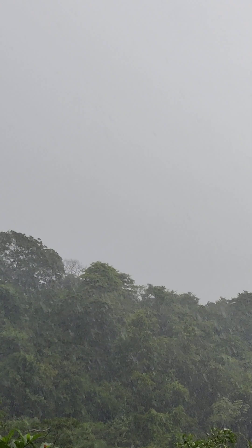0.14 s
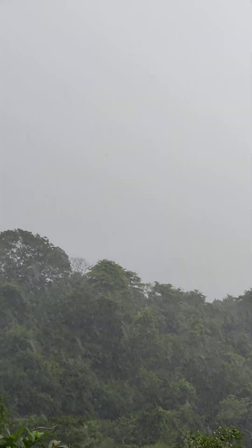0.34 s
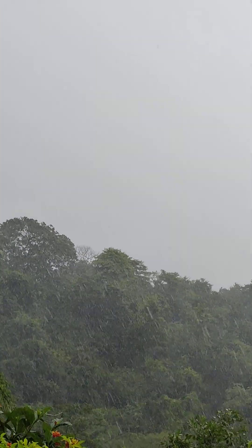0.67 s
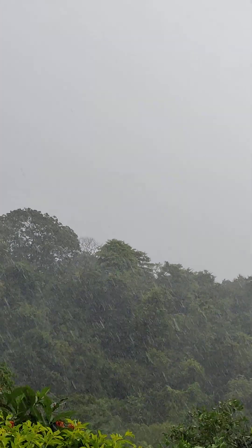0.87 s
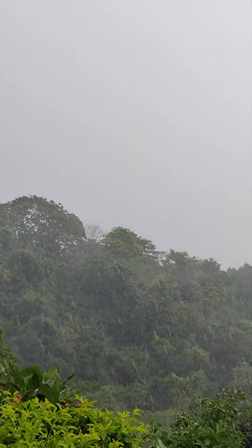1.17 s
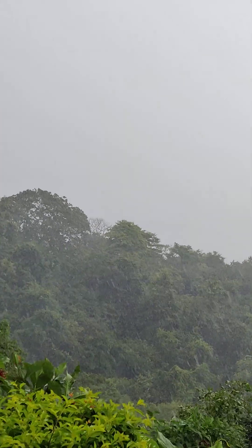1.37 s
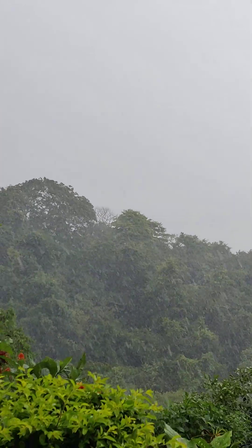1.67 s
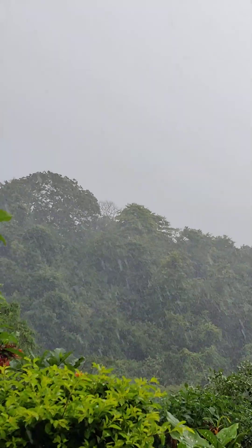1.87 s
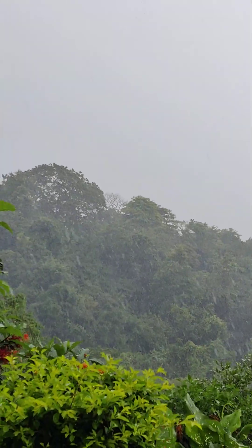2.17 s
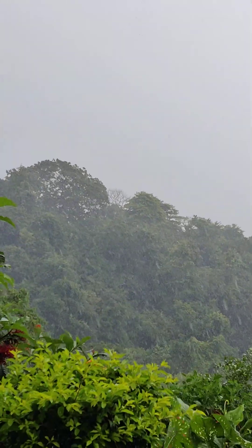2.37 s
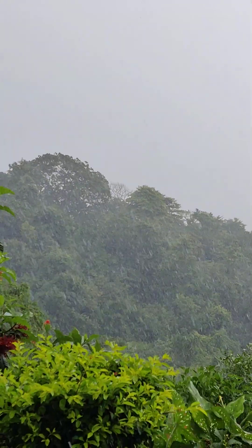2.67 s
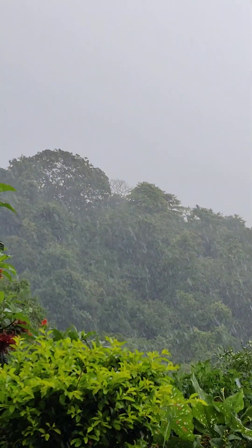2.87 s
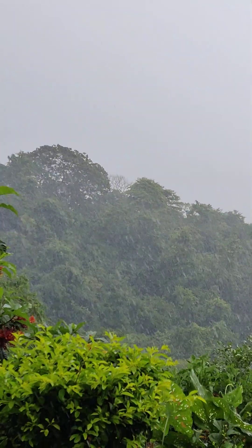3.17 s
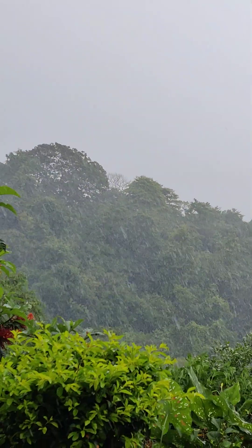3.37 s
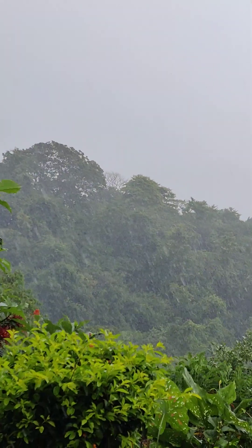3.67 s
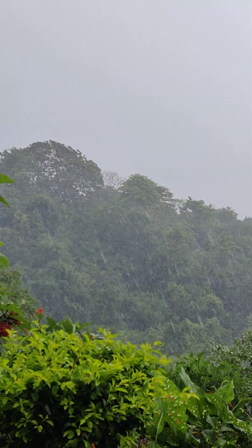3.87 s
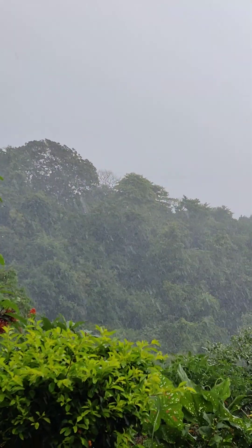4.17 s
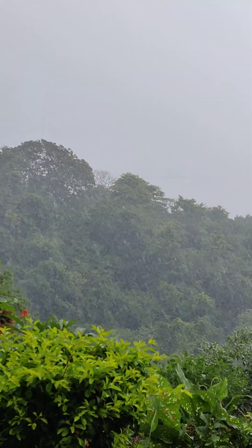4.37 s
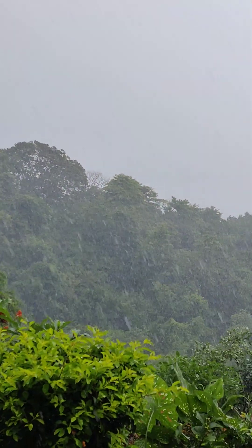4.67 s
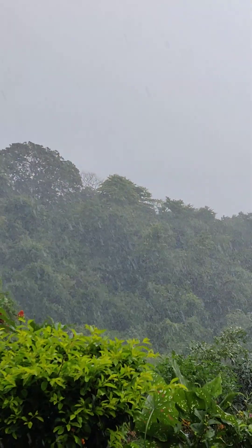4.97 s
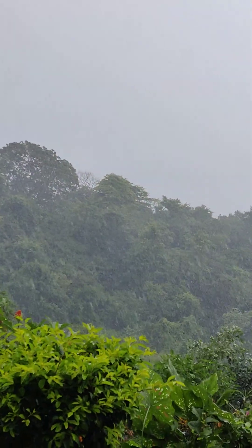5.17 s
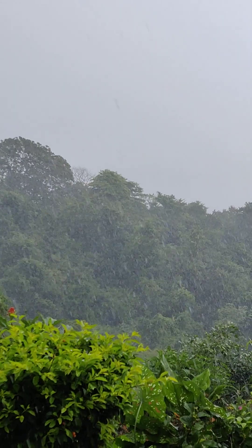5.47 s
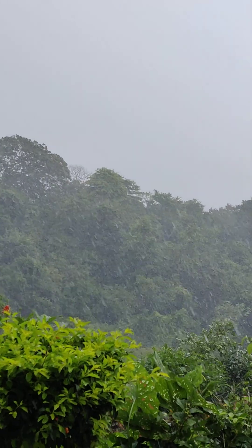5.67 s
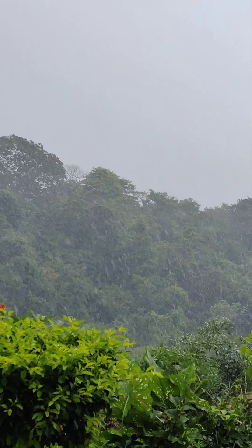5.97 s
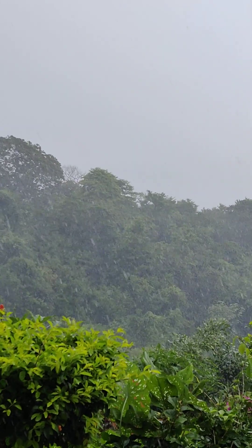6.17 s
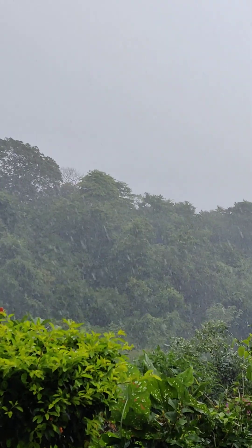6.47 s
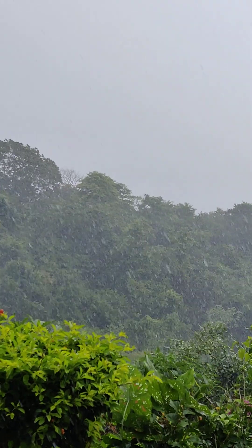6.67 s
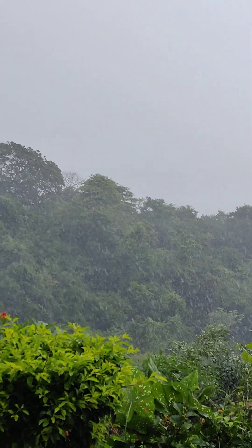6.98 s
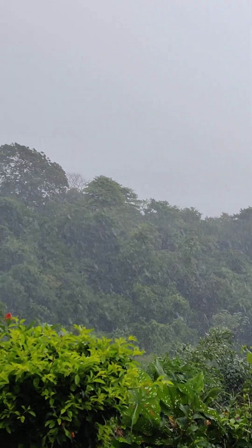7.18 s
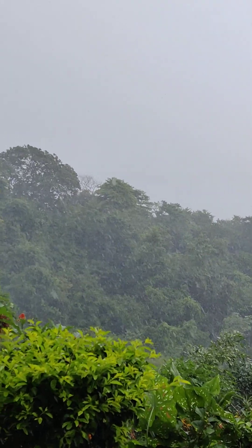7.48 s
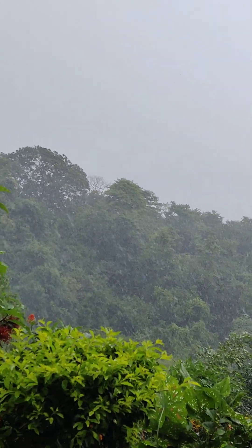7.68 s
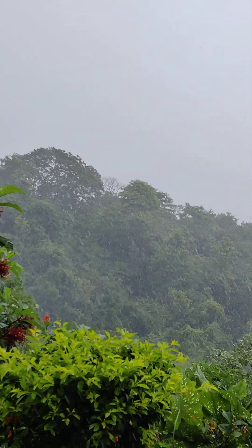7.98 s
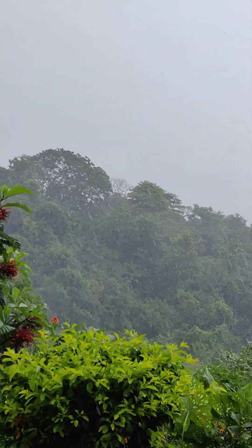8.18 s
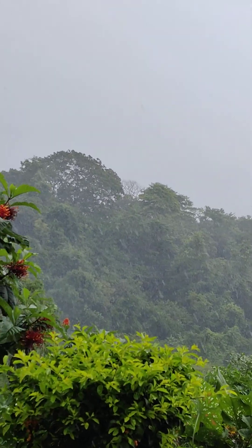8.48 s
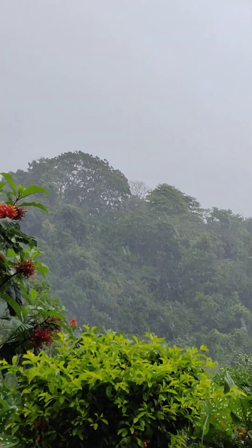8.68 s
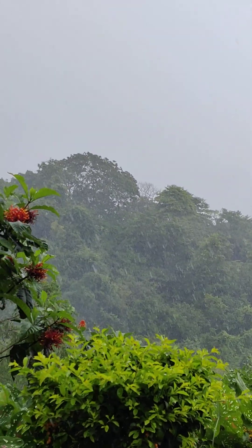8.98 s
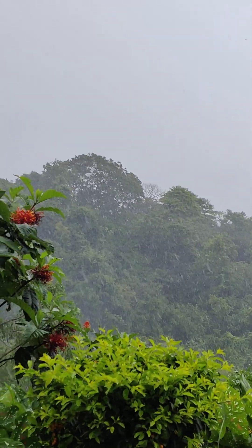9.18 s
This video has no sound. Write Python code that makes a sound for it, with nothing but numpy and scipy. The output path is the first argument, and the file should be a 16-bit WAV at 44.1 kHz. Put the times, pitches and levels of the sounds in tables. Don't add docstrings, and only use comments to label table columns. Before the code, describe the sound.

Heavy, steady rain fills the whole stretch from the first moment, falling on a wooded hillside and nearby garden plants. Far drops merge into a broad midrange roar; closer ones drum on broad leaves, with fine hiss and faint spray above. Far below, a distant motor drones faintly around 86 Hz, wavering in level and dropping very slightly in pitch near 5 s. Faint tiny ticks of close drops come at about 0.4, 0.6 and 1.3 s, then sparsely from 4 to 7.6 s. Wind rumbles on the microphone: low thumps mainly on the left at 1.7-2.5 s, a stronger cluster mainly on the right at 5.05-5.45 s, and single right puffs near 7.25 and 8.7 s. The patter is fullest around 2 and 5 s, then eases from about 5.7 s, lightest after 8.7 s, while the roar continues to the end at 9.3 s. Wide stereo, slightly rough phone treble.

```python
import sys
import numpy as np
from scipy import signal
from scipy.fft import rfft, irfft, next_fast_len
from scipy.io import wavfile
from scipy.ndimage import uniform_filter1d, map_coordinates

SR = 44100
rng = np.random.default_rng(int(sys.argv[2]) if len(sys.argv) > 2 else 0)


def unload_audio(sound):
    columns = np.transpose(np.atleast_2d(sound))
    steps = np.round(np.clip(columns, -1, 1) * 32767)
    wavfile.write(sys.argv[1], SR, steps.astype(np.int16))


def field_ratio(decibels):
    return 10 ** (np.asarray(decibels, dtype=float) / 20)


N = 411894


def unit(x):
    return x / np.sqrt(np.mean(x ** 2) + 1e-20)


def along(points, hz):
    point_hz, value = np.transpose(points)
    return np.interp(np.log(hz + 1), np.log(point_hz + 1), value)


def clock():
    return np.arange(N) / SR


def curves(rows):
    time_s, *columns = np.transpose(rows)
    return [np.interp(clock(), time_s, column) for column in columns]


def ramp(middle_s, span_s):
    return (1 + np.tanh((clock() - middle_s) / span_s)) / 2


def bump(middle_s, span_s):
    return np.exp(-((clock() - middle_s) / span_s) ** 2)


def wobble(rate_hz):
    knots = rng.standard_normal(N // 100)
    return map_coordinates(knots, [np.arange(N) * min(rate_hz, 400) / SR])


def filtered(x, response):
    size = next_fast_len(N + 8192)
    gain = response(np.fft.rfftfreq(size, 1 / SR))
    return irfft(rfft(x, size) * gain, size)[..., :N]


def smoothed_noise(shape, bins, frames):
    field = uniform_filter1d(rng.standard_normal(shape), bins, axis=1)
    return unit(uniform_filter1d(field, frames, axis=2))


def patchy(x, depth_db, bins, frames):
    z = signal.stft(x, nperseg=512)[2]
    gain = field_ratio(depth_db * smoothed_noise(z.shape, bins, frames))
    return signal.istft(z * gain, nperseg=512)[1][:, :N]


def drops(spectrum, near_db, spread_db, depth_db):
    # hz, port_correlation
    alike = [(60, 0.99), (140, 0.99), (330, 0.85), (600, 0.57), (950, 0.094), (1400, -0.33), (2200, 0.13),
             (3200, -0.056), (5000, 0.0022)]
    strike = rng.random((2, N)) < 600 / SR
    size = field_ratio(spread_db * rng.exponential(size=(2, N)))
    near = strike * rng.standard_normal((2, N)) * size
    blur = rng.standard_normal((2, N))
    pair = patchy(blur + field_ratio(near_db) * unit(near), depth_db, bins=6, frames=12)

    def mid_side_gain(hz):
        angle = np.arccos(np.clip(along(alike, hz), -1, 1)) / 2
        return field_ratio(along(spectrum, hz)) * [np.cos(angle), np.sin(angle)]

    mid, side = filtered(pair, mid_side_gain)
    return unit(np.array([mid + side, mid - side]))


def rain():
    # time_s, strength_db
    strength = [
        (0, -0.5),
        (1.9, .5),
        (3.3, 0),
        (5.2, .5),
        (5.7, -1),
        (6.4, -1.9),
        (7.6, -2.5),
        (8.3, -2),
        (8.7, -3.5),
        (9.34, -3.4),
    ]
    # hz, density_db
    body = [(40, -14), (70, -12), (110, -6), (200, -11.5), (400, -10), (560, -5.5), (750, -1.5), (1000, -5),
            (1400, -7.5), (2200, -24), (3500, -120)]
    # hz, density_db
    leaf_drum = [(500, -61), (900, -8.5), (1400, -2.5), (1800, -0.5), (2200, -1), (2700, -5.5), (3300, -12),
                 (4200, -30), (7000, -78)]
    # hz, density_db
    small_leaf = [(1500, -40), (2500, -1.5), (3300, 0.5), (4000, -1), (4700, -2), (5500, -2), (6250, -1),
                  (6700, -2.5), (7400, -6), (8500, -14.5), (8800, -27), (10000, -57)]
    # hz, density_db
    mist = [(7000, -52), (8700, 0.5), (9800, 0.5), (11500, -3.5), (13200, -5), (14500, -7), (15120, -9),
            (15200, -30)]
    # hz, left_minus_right_db
    lean = [(60, 0), (110, 1.5), (200, 2), (380, 2.0), (690, 2), (1280, -0.5), (2360, -3), (4350, 3),
            (8020, -0.5), (14800, 1)]
    strength_db, = curves(strength)
    fine_db = -1.07 * ramp(middle_s=8, span_s=.4)
    swell_db = 0.95 * bump(middle_s=6.1, span_s=2.3)

    roar_db = -32.5 + 0.18 * strength_db + swell_db
    patter_db = -32 + strength_db
    hiss_db = -35 + .1 * strength_db + fine_db + 0.37 * wobble(6.7)
    spray_db = -63 + .25 * strength_db + fine_db + .4 * wobble(9)

    roar = field_ratio(roar_db) * drops(body, near_db=-18.5, spread_db=1.5, depth_db=0.33)
    patter = field_ratio(patter_db) * drops(leaf_drum, near_db=-16.0, spread_db=2.5, depth_db=.5)
    hiss = field_ratio(hiss_db) * drops(small_leaf, near_db=-14, spread_db=2.5, depth_db=0.09)
    spray = field_ratio(spray_db) * drops(mist, near_db=-17, spread_db=3.0, depth_db=0.0)
    halves = np.array([[.5], [-.5]])
    return filtered(roar + patter + hiss + spray, lambda hz: field_ratio(along(lean, hz) * halves))


def motor():
    # time_s, level_db
    surges = [(0, -47.5), (.55, -58), (.9, -46.5), (1.6, -48), (1.8, -54), (2.2, -45.5), (3.1, -47.5),
              (3.4, -54), (3.7, -50.5), (4.3, -48.5), (4.55, -62), (4.85, -42), (5.4, -41.5), (5.55, -53),
              (6.1, -53), (6.35, -43.5), (7.7, -44.5), (9.34, -43.5)]
    # pitch_multiple, level_db
    orders = [(1, 0), (1.5, -18), (2, -20), (3, -12)]
    fast_hz, slow_hz = 88, 85.5
    level_db, = curves(surges)
    pitch_hz = fast_hz + (slow_hz - fast_hz) * ramp(middle_s=4.9, span_s=2.186)
    phase = 2 * np.pi * np.cumsum(pitch_hz + .3 * wobble(3)) / SR
    tone = sum(field_ratio(order_db + 1.14 * wobble(3.1)) * np.sin(multiple * phase) for multiple, order_db in orders)
    port_db = np.array([[1.1], [-1.1]])
    return np.sqrt(2) * field_ratio(level_db + port_db) * tone


def wind():
    # hz, density_db
    eddy_spectrum = [(10, -24), (22, 3.5), (40, 0), (70, -9.5), (130, -23.5), (250, -30), (500, -70)]
    # left_db, right_db
    lulls = [-46, -47.5]
    # middle_s, peak_db, half_length_s
    left_gusts = [(1.3, -41, .1), (2.0, -31, .27), (2.45, -32, .2), (3.05, -32, .2), (3.45, -37, .1),
                  (4.1, -40, .5), (5.1, -37, .2), (5.5, -34, .18), (5.85, -34.5, .12), (6.5, -36, .12),
                  (6.85, -41, .2), (7.3, -34, .2), (9.2, -41, .1)]
    # middle_s, peak_db, half_length_s
    right_gusts = [(1.7, -41, .3), (2.2, -37, .25), (2.7, -35, .15), (3.1, -37, .15), (3.4, -40.5, .15),
                   (4.07, -37, 0.13), (4.45, -37.5, 0.13), (5.05, -32, .2), (5.6, -31, .4),
                   (6.152, -32.5, .2), (6.7, -33, 0.29), (7.15, -32, .3), (7.55, -39, .15),
                   (8.45, -36, .12), (8.75, -37, .1), (9.1, -37, .1)]
    lumps = field_ratio(2.3 * np.array([wobble(16), wobble(16)]))
    turbulence = filtered(rng.standard_normal((2, N)), lambda hz: field_ratio(along(eddy_spectrum, hz)))
    rumble = unit(lumps * turbulence)
    power = []
    for lull_db, gusts in zip(lulls, (left_gusts, right_gusts)):
        gust_power = sum((field_ratio(peak_db) * bump(s, span_s)) ** 2 for s, peak_db, span_s in gusts)
        power.append(field_ratio(lull_db) ** 2 + gust_power)
    return rumble * np.sqrt(power)


def ticks():
    # start_s, peak_db
    bursts = [
        (0.414, -52),
        (0.5696, -49),
        (1.2725, -51),
        (4.0382, -53),
        (4.8569, -53),
        (5.2111, -56),
        (5.472, -55),
        (5.7334, -55),
        (5.9758, -54),
        (7.5587, -54),
    ]
    out, t = np.zeros(N + SR), np.arange(300) / SR
    for start_s, peak_db in bursts:
        decay = field_ratio(peak_db + 4 - 60 * t / .006)
        out[round(start_s * SR):][:len(t)] += decay * rng.standard_normal(len(t))
    bright = [(4000, -30), (9000, -3), (12000, 0), (15300, 0)]  # hz, gain_db
    return filtered(out[:N], lambda hz: field_ratio(along(bright, hz)))


def puffs():
    # middle_s, peak_db, pitch_hz, push +1 or suck -1
    left_puffs = [(1.712, -25, 45, 1), (1.865, -19, 32, 1), (1.894, -16, 78.5, -1), (1.903, -15, 32, 1),
                  (1.993, -20, 40, -1), (2.24, -20, 80, 1), (2.401, -23, 50, -1), (2.515, -14, 40, 1),
                  (2.989, -23, 124, 1), (4.736, -18, 30.8, 1), (5.427, -21, 50, 1), (6.009, -22.4, 50, 1)]
    # middle_s, peak_db, pitch_hz, push +1 or suck -1
    right_puffs = [(3.156, -24, 40, 1), (4.058, -22.5, 45, -1), (5.059, -20, 50, -1), (5.088, -21, 25, 1),
                   (5.123, -20, 63, 1), (5.141, -13, 63, 1), (5.15, -16.5, 159, -1), (5.295, -21, 63, 1),
                   (5.402, -16, 63, 1), (5.431, -17, 63, 1), (5.443, -18, 70, -1), (5.451, -11.5, 36, 1),
                   (6.68, -26, 50, -1), (7.255, -16, 63, 1), (8.66, -19, 63, 1)]
    steep_front = 1.4
    out, t = np.zeros((2, N + SR)), np.arange(-2000, 2001) / SR
    for port, eddies in enumerate((left_puffs, right_puffs)):
        for middle_s, peak_db, pitch_hz, way in eddies:
            u = (np.pi * pitch_hz * t * steep_front ** -np.sign(t)) ** 2
            pulse = (1 - 2 * u) * np.exp(-u)
            start = round(middle_s * SR) - len(t) // 2
            out[port, start:][:len(t)] += np.sign(way) * field_ratio(peak_db) * pulse
    return out[:, :N]


def scene():
    return rain() + motor() + wind() + ticks() + puffs()


def sub_bands(x):
    # centre_hz, width_hz, gain_db
    seams = [(7920, 60, -7), (8230, 50, -11), (8600, 50, -30), (8920, 70, -42), (9260, 70, -10),
             (9580, 80, -9), (9920, 60, -4)]
    # hz, threshold_db re median
    holes = [(2000, -14), (3300, -5), (4600, -2), (6000, -3), (7300, 2), (8200, 1), (10000, -6),
             (15000, -6)]
    band_hz = SR / 128
    hz, t, z = signal.stft([x[0] + x[1], x[0] - x[1]], SR, nperseg=2048, noverlap=1536)

    band, hop = (hz // band_hz).astype(int), np.arange(len(t)) // 3
    step = rng.standard_normal((2, 65, len(t) // 3 + 1))[:, band][..., hop]
    jump_points = [(7000, 0), (8400, 1.5), (8800, 11), (9500, 7), (10200, .8), (14500, .8), (15000, 4)]
    jump_db = along(jump_points, hz)[:, None] * np.minimum(step, .6)

    need = smoothed_noise(z.shape, bins=10, frames=3)
    power = uniform_filter1d(abs(z) ** 2, size=3, axis=1)
    threshold = field_ratio(along(holes, hz)[:, None] + 3 * need) ** 2
    weak = power < np.median(power, axis=2, keepdims=True) * threshold

    rough = signal.istft(z * field_ratio(jump_db - 25 * weak), SR, nperseg=2048, noverlap=1536)[1][:, :N]

    def seam_gain(hz):
        return field_ratio(sum(db * np.exp(-((hz - centre) / width) ** 2) for centre, width, db in seams))

    mid, side = filtered(rough, seam_gain) / 2
    return np.array([mid + side, mid - side])


def low_pass(x):
    return signal.sosfilt(signal.butter(12, 15390, fs=SR, output="sos"), x)


def record(dry):
    mix = sub_bands(dry)
    return low_pass(mix)


dry = scene()
out = record(dry)
unload_audio(out)
```